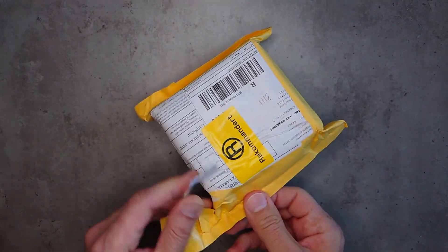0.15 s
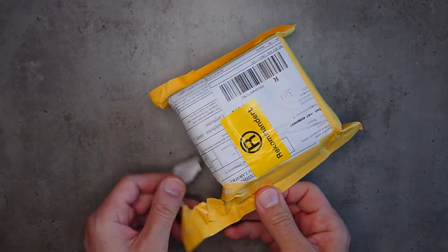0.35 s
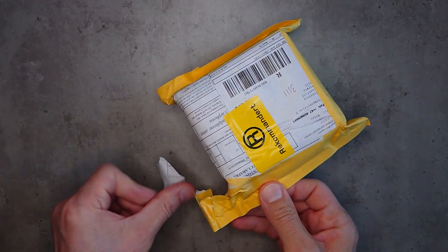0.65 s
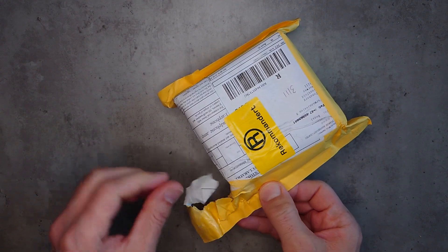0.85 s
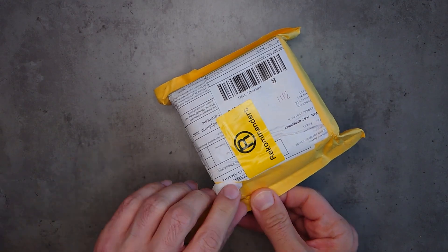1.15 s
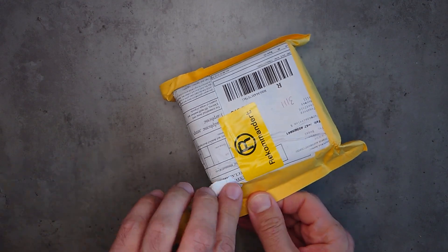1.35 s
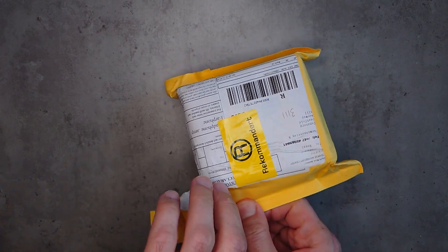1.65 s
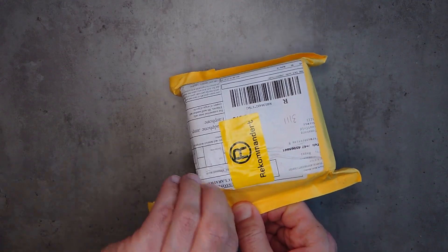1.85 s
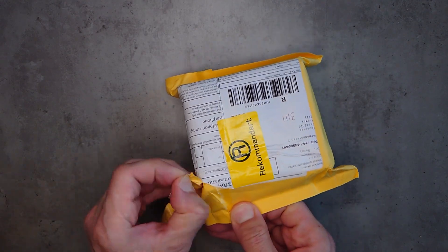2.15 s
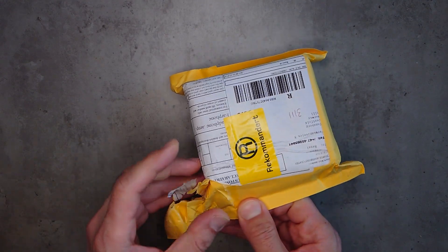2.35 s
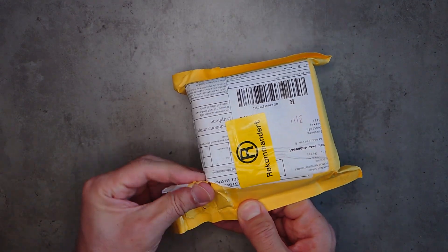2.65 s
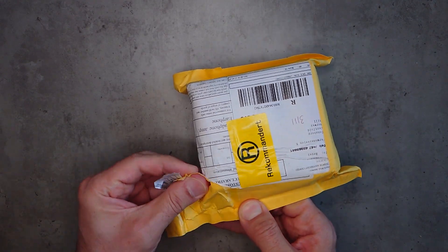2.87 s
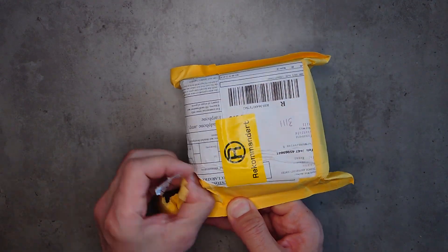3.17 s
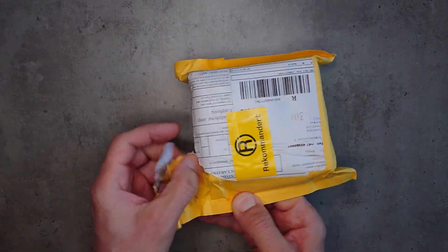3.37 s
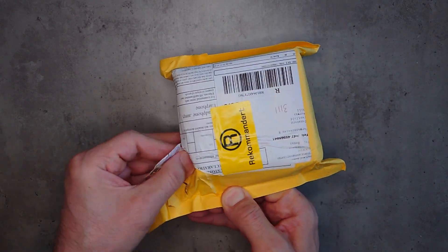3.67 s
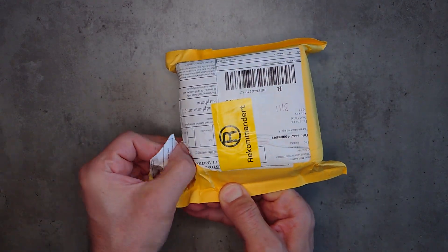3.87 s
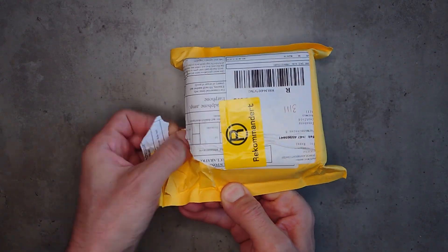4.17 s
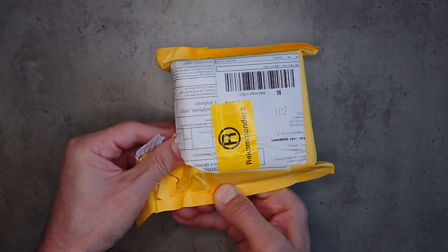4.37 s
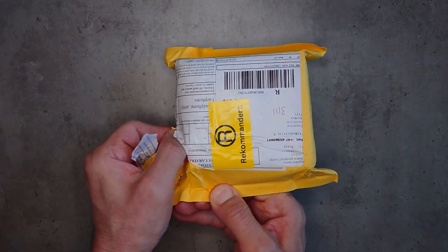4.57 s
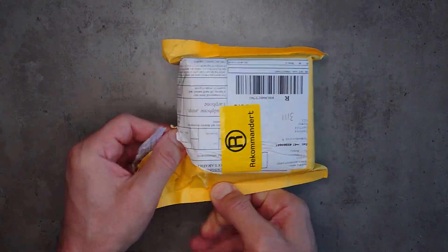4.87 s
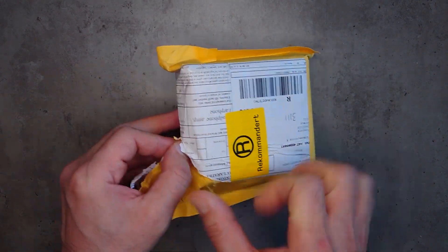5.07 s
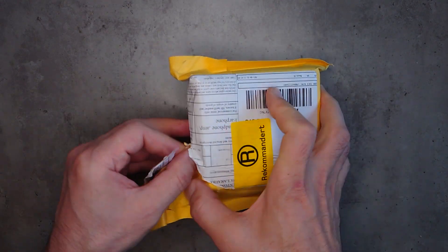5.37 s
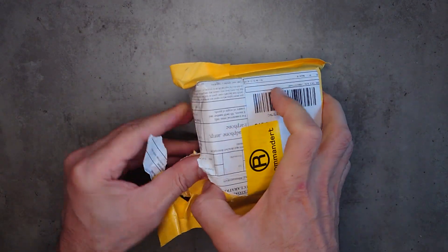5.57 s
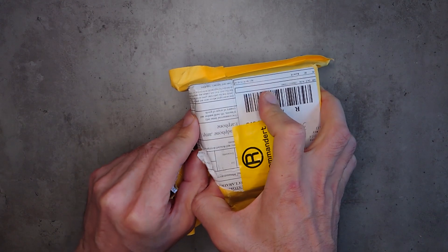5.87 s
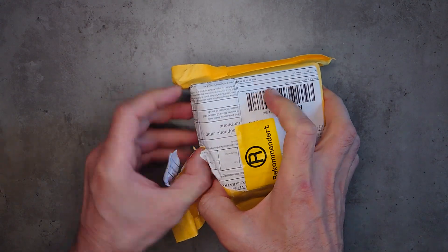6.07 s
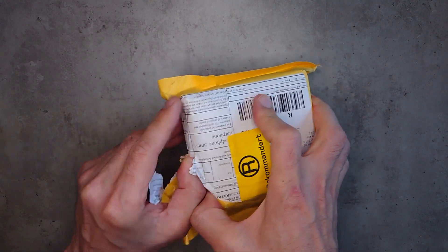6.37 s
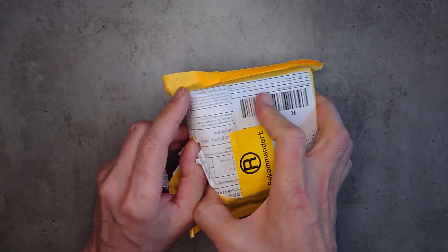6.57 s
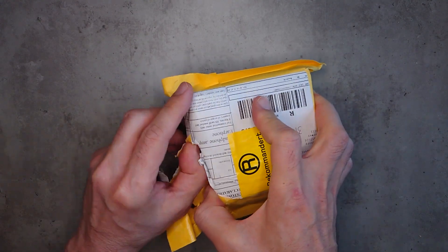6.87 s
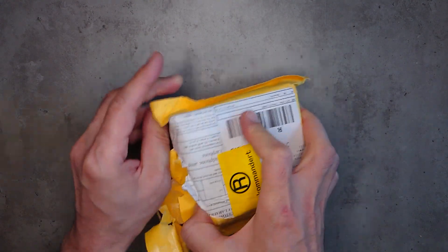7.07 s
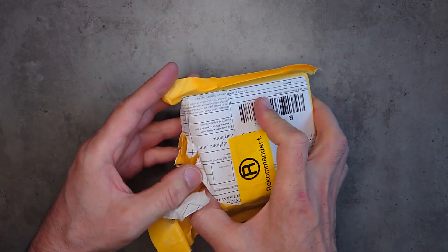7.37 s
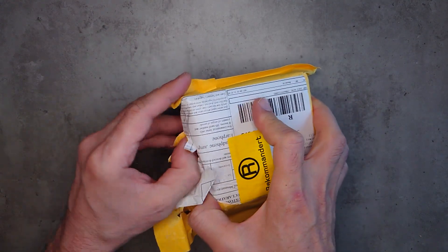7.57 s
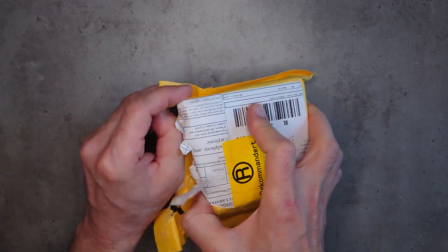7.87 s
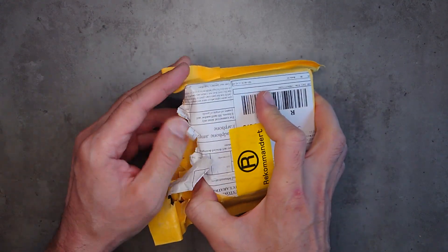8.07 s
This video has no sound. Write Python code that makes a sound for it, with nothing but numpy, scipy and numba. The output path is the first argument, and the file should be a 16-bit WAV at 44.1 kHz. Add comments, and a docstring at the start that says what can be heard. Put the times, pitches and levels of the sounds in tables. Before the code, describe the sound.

Fingers pull at a padded paper mailer in a quiet room. A brief crumple opens, then sparse light rustles and tiny ticks. From about three seconds sharp crease snaps and denser crackling arrive, becoming strongest around seven to eight seconds. Soft low table bumps occur now and then. Close stereo microphones catch crisp, dry detail with a short room tail over faint hum and air.

```python
"""A crackle and a rustle come first: fingers crumple and tear a padded paper envelope on a table.
Creases snap one by one as short ringing wavelets, over a dense rustle of thousands of smaller ones.
A thumb drags over the flat faces, and the parcel bumps the table, whose top rings low.
Sharp echoes and a short room tail follow the paper; a wavering hum, a rumble and faint air lie beneath.
Two microphone ports pick it all up in stereo, each with its own tone colour."""
import sys
import numpy as np
from scipy import signal
from scipy.fft import rfft, irfft, next_fast_len
from scipy.io import wavfile
from scipy.ndimage import uniform_filter1d
from numba import njit

SR = 44100
rng = np.random.default_rng(int(sys.argv[2]) if len(sys.argv) > 2 else 0)


def transcribe(signal):
    """Save signal, clipped to [-1, 1], as a 16-bit WAV file at the path in sys.argv[1]."""
    frames = np.atleast_2d(signal).T
    limited = np.clip(frames, -1, 1)
    pcm = np.round(limited * 32767).astype(np.int16)
    wavfile.write(sys.argv[1], SR, pcm)


N = 362943  # length in samples
PADDING_HZ, FOLD_HZ, FIBRE_HZ, PARCEL_HZ = 697, 1320, 10300, 353


def undb(db):
    """Turn decibels into a plain gain."""
    return 10 ** (np.asarray(db) / 20)


def unit(x):
    """Scale a sound to an average (RMS) level of 1."""
    return x / np.sqrt(np.mean(x ** 2))


def along(table):
    """Draw straight lines between the points of a table: one value per sample for each column after time."""
    s, *columns = np.transpose(table)
    return [np.interp(np.arange(N) / SR, s, column) for column in columns]


def colour(x, points):
    """Shape the tone by (pitch_hz, level_db) points, joined on a log pitch axis."""
    size = next_fast_len(x.shape[-1])
    point_hz, point_db = np.transpose(points)
    hz = np.arange(size // 2 + 1) * SR / size
    gain = undb(np.interp(np.log(hz + 1), np.log(point_hz), point_db))
    return irfft(rfft(x, size) * gain, size)[..., :x.shape[-1]]


def walk(rate):
    """A random wandering curve around 0: new values `rate` times a second, joined by slopes."""
    hold = int(SR / rate)
    values = rng.standard_normal(N // hold + 1)
    return 1.056 * uniform_filter1d(np.repeat(values, hold), hold)[:N]


@njit
def flicks(n, sr, s, hz, cycles, ring, size, pan, lag):
    """Short sine wavelets under a bell curve whose falling side is stretched by `ring`.

    pan is the left-to-right gain ratio; lag is how many samples the right port hears later.
    """
    out = np.zeros((2, n))
    for k in range(len(s)):
        wide = cycles[k] * sr / hz[k] / 2  # samples
        for c in range(2):
            mid = s[k] * sr + (c - .5) * lag[k]
            gain = size[k] * pan[k] ** (.5 - c)
            first = max(int(mid - 3 * wide), 0)
            last = min(int(mid + 3 * wide * ring) + 2, n)
            for i in range(first, last):
                u = (i - mid) / (wide * ring if i > mid else wide)
                out[c, i] += gain * np.exp(-u * u) * np.sin(2 * np.pi * hz[k] * (i - mid) / sr)
    return out


# Snapping creases, with the level of each part of the snap:
# start_s, padding_db, fold_db, crease_db, crease_pitch_hz, fibres_db, after_crackle_db (against the crease)
CREASE_SNAPS = [(0.0189, -25, -19.5, -24, 2760, -28, 3.5), (0.2119, -64, -37, -36, 4480, -30, 1),
                (0.2857, -35, -27, -27, 3400, -24, 3.5), (0.292, -44, -40, -26, 4600, -20.5, -6),
                (0.3011, -51, -30, -27, 4600, -24, -10), (.7268, -59, -36, -28.5, 3920, -9.5, 7.5),
                (1.0762, -64, -31.5, -31, 4830, -38, -17), (1.3033, -40, -44, -23.5, 2800, -32, -15),
                (1.416, -69, -37, -32.5, 2700, -36, -7), (1.4745, -67, -33.5, -20, 6450, -27, -26),
                (1.482, -53, -49, -44, 2600, -48, -4), (1.7604, -71, -54, -33.5, 5500, -51, -7),
                (2.034, -63, -45, -45, 3770, -27.5, -15), (2.0621, -44, -34, -35, 3070, -34, -12),
                (2.1387, -47, -31, -50, 4020, -13.5, -12), (2.2364, -56, -51, -27.5, 5330, -42, -12),
                (2.241, -40, -37, -44, 3000, -43, -12), (2.286, -38, -39, -39, 2660, -37, -7),
                (2.3482, -43, -33.5, -43, 2200, -26.5, 5), (2.4065, -32, -36.5, -36, 2480, -53, -23),
                (2.5264, -53, -44, -44, 2710, -39, 0), (2.569, -45, -61, -22, 5370, -29, -12),
                (2.741, -58, -32.5, -24, 2160, -41, -8.5), (3.1259, -27.5, -16, -2.5, 3300, -17, -13.5),
                (3.254, -37, -46, -24.5, 3500, -26, 0), (3.2666, -32, -15.5, -14.5, 2510, -37, -6),
                (3.3754, -56, -56, -23, 4920, -26, -15), (3.3836, -56, -51, -26, 4680, -31, -12),
                (3.4144, -42, -20, -15, 3830, -29, -10), (3.4538, -45, -32, -36, 3290, -28, -20),
                (3.508, -46, -29, -15.5, 2870, -35, -22), (3.5172, -34, -25.5, -10.5, 3380, -28, -15),
                (3.8765, -40, -20, -12.5, 2530, -37, -14), (3.9427, -30, -23.5, -25.5, 2900, -21, 4),
                (4.0214, -41, -36, -37, 2940, -39, -12), (4.0699, -59, -41, -29, 3330, -36, -1),
                (4.0779, -32.5, -47, -17.5, 3270, -15, -1.5), (4.1951, -38, -38, -38, 4830, -40, -12),
                (4.2515, -41, -26.5, -18.5, 2510, -40, -18), (4.2956, -34, -32, -26, 5840, -23, -10),
                (4.494, -52, -43, -31, 6360, -30, -6), (4.518, -45, -33, -33, 2500, -42, -1),
                (4.57, -54, -52, -44, 5030, -23, -12), (4.574, -58, -43, -32, 4170, -32, -8),
                (4.6651, -55, -43, -34.5, 3500, -33, -9), (4.825, -31, -27.5, -34.5, 4500, -35, -1),
                (4.8576, -50, -52, -33, 3730, -37, 1), (5.0134, -61, -28.5, -25, 3150, -37, -11),
                (5.2834, -53, -49, -39.5, 4080, -40, 1), (5.4061, -52, -47, -26, 4270, -32, -22),
                (5.443, -40, -34, -44, 2930, -40, -10), (5.4743, -57, -40, -22, 3520, -39, -13),
                (5.6687, -29, -26, -20, 4200, -27, -4), (5.88, -50, -48, -39, 3000, -45, -14),
                (5.971, -35, -34, -36, 2480, -43, -17), (5.9929, -30.5, -30, -20.5, 2330, -39, -18),
                (5.9992, -32.5, -18, -15, 4780, -24, -20), (6.0285, -52, -26.5, -28, 2610, -43, -15),
                (6.0747, -50, -28, -14, 3630, -52, -28), (6.3953, -25.5, -40, -31, 2850, -41, -9),
                (6.4077, -46, -35, -23, 3600, -36, -11), (6.4575, -39, -51, -18, 2970, -20, 0),
                (6.527, -46, -47, -26, 3700, -27, 2), (6.536, -26, -37, -13, 2540, -20, -15),
                (6.7104, -21, -24, -13.5, 2740, -39, -10.5), (6.7677, -31, -25.5, -19.5, 4060, -30, 7),
                (6.9971, -34, -28, -19.5, 4470, -34, -7.5), (7.03, -40, -36, -23, 3600, -24, -4),
                (7.0325, -37, -19, -8, 4020, -13, 0), (7.0365, -20, -9, -12, 2720, -30, -3.5),
                (7.0974, -30, -28, -25.5, 4070, -28, 6), (7.1038, -34, -40, -11.5, 2430, -36, -26),
                (7.2189, -34.5, -40, -20, 2380, -37, -12), (7.3, -45, -31, -34, 3580, -27, 0),
                (7.3046, -46, -42, -29, 3100, -34, -13), (7.4978, -40.5, -33, -36, 3800, -46, -12),
                (7.8095, -41, -59, -32, 5250, -29, 2), (7.8817, -30, -40, -28, 2780, -27, -12),
                (7.932, -22, -6.5, -8.5, 2730, -17, -5), (8.1642, -35, -41, -16.5, 3200, -32, -8.5)]


def snaps():
    """Each snap rings the padding and the fold, flicks the crease and ticks the fibres; smaller creases follow."""
    s, padding_db, fold_db, crease_db, hz, fibre_db, after_db = np.transpose(CREASE_SNAPS)
    chance = rng.random((len(s), 28)).T
    one = np.ones(len(s))
    pan, lag = undb(1.24 * (chance[0] - 3.0) + 1.0), 4.6 * (chance[0] - .5)
    detune = 1.35 ** (chance[1:4] - .5)  # no two folds have the same size
    out = flicks(N, SR, s, hz, 1.32 * one, 1.18, undb(crease_db), pan, lag)
    padding_hz, fold_hz = PADDING_HZ * detune[0], FOLD_HZ * detune[1]
    out += flicks(N, SR, s + 0.00049, padding_hz, 1.07 * one, 2.6, undb(padding_db), pan, lag)
    out += flicks(N, SR, s + 0.00015, fold_hz, 1.82 * one, 0.61, undb(fold_db), pan, lag)

    for k in range(4):  # a few fibres part within about two milliseconds
        fibre_s = s + 0.00223 * k / 3 * chance[4 + k]
        fibre_hz = FIBRE_HZ * 1.35 ** (chance[12 + k] - .5)
        out += flicks(N, SR, fibre_s, fibre_hz, 0.97 * one, 1.04, undb(fibre_db - 2.44 * k), pan, lag)

    # eight small creases crackle around and just after each snap; later ones are weaker
    late, pitch, size = chance[4:].reshape(3, 8, -1)
    many = np.ones_like(late)
    after_s = s - .0008 + 0.0072 * late
    after_hz = hz * 4.0 ** (pitch - .45)
    after_size = undb(crease_db + after_db - 6 * size - 9 * late)
    return out + flicks(N, SR, after_s.ravel(), after_hz.ravel(), 2.4 * many.ravel(), 0.57,
                        after_size.ravel(), (pan * many).ravel(), (lag * many).ravel())


# Each pull or squeeze of the fingers is one surge of rustle:
# peak_s, swell_s, fade_s, large_folds_db, small_creases_db, fibres_db, small_crease_pitch_hz
FINGER_PULLS = [(0.02, 0.089, 0.054, -41, -41, -45, 3230), (.19, 0.13, 0.12, -56, -53.5, -61, 3950),
                (.299, 0.047, 0.064, -48, -46, -45, 4400), (.712, 0.063, 0.017, -66, -67, -59, 5030),
                (.974, 0.0096, 0.016, -58, -51.5, -61, 3800), (1.078, 0.017, 0.037, -63, -54, -50.5, 4600),
                (1.137, 0.054, 0.069, -54, -51, -53, 4600), (1.348, 0.04, 0.037, -52, -50, -52, 3900),
                (1.485, .06, 0.054, -52, -53, -60, 4520), (1.692, 0.17, 0.12, -55.5, -50, -62, 4180),
                (1.951, 0.038, 0.041, -45.5, -43.5, -48.5, 4300),
                (2.149, 0.077, 0.069, -41, -42, -42.5, 3900), (2.33, 0.083, 0.057, -60, -55.5, -59, 3470),
                (2.57, 0.024, 0.11, -48.5, -46.5, -54, 4560), (2.957, 0.12, 0.031, -49, -50, -54, 3060),
                (3.115, 0.097, 0.075, -52, -44.5, -52, 3680), (3.254, 0.0054, 0.035, -43, -40, -41.5, 3450),
                (3.304, .04, 0.064, -50.5, -37.5, -44, 4600),
                (3.454, 0.013, 0.052, -41.5, -35.5, -43.5, 4150),
                (3.757, 0.22, 0.12, -50.5, -48.5, -53, 4160), (3.951, 0.018, 0.14, -66, -44.5, -53, 3560),
                (4.079, 0.013, 0.032, -45.5, -43.5, -49, 3450), (4.157, .017, 0.011, -44, -41, -45, 3400),
                (4.329, 0.077, 0.033, -44.5, -40.5, -46.5, 2850),
                (4.476, 0.027, 0.074, -59, -48.5, -51, 2960), (4.576, 0.13, 0.18, -53.5, -49, -54.5, 3660),
                (4.833, 0.034, 0.23, -51.5, -54, -57, 3550), (5.012, 0.053, 0.031, -47.5, -45, -48, 2840),
                (5.21, 0.17, .07, -61.5, -55, -60, 4200), (5.294, 0.015, 0.11, -56, -52, -58, 3150),
                (5.488, 0.061, 0.026, -51, -41.5, -47.5, 4300),
                (5.595, 0.048, 0.088, -50, -48.5, -52.5, 4700), (5.676, 0.015, 0.028, -51, -39, -42, 3700),
                (5.805, 0.069, 0.3, -50.5, -48, -52, 4060), (6.006, 0.015, 0.033, -49.5, -41, -53, 3530),
                (6.16, 0.09, 0.064, -56, -47.5, -56, 3660), (6.218, 0.02, 0.011, -43.5, -34.5, -35, 3780),
                (6.316, .08, 0.4, -61, -48.5, -58, 4020), (6.457, 0.18, 0.031, -47.5, -45.5, -44.5, 3420),
                (6.537, 0.052, .15, -54, -61, -47.5, 3030), (6.727, 0.043, 0.064, -66, -44.5, -47.5, 3040),
                (6.88, .06, 0.068, -47.5, -48.5, -50, 3500), (7.039, 0.019, 0.077, -39.5, -45, -48, 3200),
                (7.1, 0.052, 0.017, -39, -28.5, -34.5, 3100), (7.198, 0.093, 0.04, -43, -34.5, -39.5, 3790),
                (7.301, 0.0084, 0.0073, -44, -32, -43, 3490),
                (7.348, 0.028, 0.03, -42.5, -45.5, -47.5, 3830),
                (7.499, 0.078, 0.042, -55, -46.5, -52, 3800), (7.623, .042, 0.066, -47.5, -40, -45.5, 4560),
                (7.886, 0.0051, 0.033, -37, -29.5, -33.5, 2960), (7.92, 0.11, 0.056, -43.5, -41, -40, 2930),
                (8.119, 0.048, 0.058, -42, -38.5, -41.5, 3530),
                (8.229, 0.017, 0.036, -46.5, -32, -40, 3460)]
SLOPE_DB = 10  # a surge gains this much over its swell time and loses it over its fade time


def pulls():
    """Levels in dB of folds, creases and fibres, and the crease pitch; overlapping surges add up in power."""
    t = np.arange(0, N / SR + .002, .001)
    s, swell, fade, *peaks_db, hz = np.array(FINGER_PULLS).T[:, :, None]
    before = (s - t) / np.maximum(swell, .003)
    after = (t - s) / np.maximum(fade, .003)
    away = np.where(t < s, before, after)
    powers = [np.sum(undb(db - SLOPE_DB * away) ** 2, axis=0) for db in peaks_db]
    levels = [10 * np.log10(power + 1e-12) for power in powers]
    crease_hz = np.interp(t, s[:, 0], hz[:, 0])
    return along(np.transpose([t, *levels, crease_hz]))


# Grains of the parcel, large folds, small creases and fibres, one row each:
# pitch_spread_octaves, length_cycles (longer when a face rings), grains_per_s, size_scatter_db,
# share_that_rings_a_face (0 to 1)
RUSTLE_GRAINS = [(0.5, 1.33, 400, 3.5, 0.013), (0.538, 1.27, 1600, 3.5, 0.32),
                 (0.599, 1.79, 5000, 2.5, 0.22), (1, 0.55, 9300, -0.1, 0.)]
# Pitch of the large folds over time: time_s, pitch_hz
LARGE_FOLD_PITCH = [(0, 890), (.4, 1333), (1.8, 1193), (3.5, 1084), (5.8, 1013), (7.2, 1263), (8.23, 1200)]
# The whole parcel flexes with the large folds: time_s, level_db (against the large folds)
PARCEL_FLEX = [(0, -11.5), (.4, -11), (1, -23), (4.5, -21), (5.6, -13), (7.1, -10), (8.23, -17.5)]
# Flat faces of the envelope that ring: pitch_hz
FACE_PITCHES = [500., 640., 890., 1080., 1390., 2050., 2390., 2850., 3750., 4200., 4750., 5500., 6800.]


def rustle():
    """Dense grains of random pitch, size and place; their level is uneven as the paper slips."""
    fold_db, crease_db, fibre_db, crease_hz = pulls()
    fold_hz, = along(LARGE_FOLD_PITCH)
    levels = [fold_db + along(PARCEL_FLEX)[0], fold_db, crease_db, fibre_db]
    centres = [np.full(N, PARCEL_HZ), fold_hz, crease_hz, np.full(N, FIBRE_HZ)]
    faces_hz = np.array(FACE_PITCHES)
    out, slip = 0, walk(40)  # the slip is shared by all four layers
    # the fingers damp and free each face independently
    freed = undb([min(hz / 800, 4) * walk(8) for hz in faces_hz])

    for (octaves, cycles, rate, scatter_db, share), db, centre in zip(RUSTLE_GRAINS, levels, centres):
        when, size, side, sign, rings, a, b, c = rng.random((int(rate * N / SR), 8)).T
        at = (when * N).astype(int)
        bell = 2 * (a + b + c) - 3  # random, most often near 0
        hz = np.minimum(centre[at] * 2 ** (octaves * bell), .42 * SR)

        # some grains ring the face nearest in pitch, and ring longer
        face = np.argmin(np.abs(np.log(hz[:, None] / faces_hz)), axis=1)
        rings = rings < share
        hz = np.where(rings, faces_hz[face] * (1 + 0.084 * (a - b)), hz)
        lengths = cycles * np.where(rings, 2.6, 1.)

        size = np.sign(sign - .5) * undb(-scatter_db * np.log(1.004 - size))
        size = size * np.where(rings, freed[face, at], 1)
        pan, lag = undb(11 * (side - .5) - 1), 7 * (side - .5)
        layer = flicks(N, SR, when * N / SR, hz, lengths, 1.07, size, pan, lag)
        out = out + unit(layer) * undb(db + 1.15 * slip + 2.97 * walk(70))
    return out


# A thumb drags over one face: middle_s, length_s, pitch_hz, level_db (each slip varies around pitch and level)
THUMB_RUBS = [(1.13, 0.054, 1280, -59), (2.935, 0.076, 1270, -46), (7.905, 0.017, 2450., -34.5),
              (1.11, .1, 5600, -58), (1.68, .14, 4700, -56), (1.69, .14, 1290, -58), (3.04, .12, 1400, -54),
              (4.3, 0.077, 2800, -48), (4.485, .05, 2800, -56)]


def rubs(count=40):
    """Quick slips of the skin, scattered over each drag, keep one face of the envelope ringing."""
    s, length, hz, db = np.repeat(THUMB_RUBS, count, axis=0).T
    when, pitch, size = rng.random((len(s), 3)).T - 1 / 2
    one = np.ones(len(s))
    slip_s, slip_hz = s + length * when, hz * 2 ** (pitch / 4)
    return flicks(N, SR, slip_s, slip_hz, 4 * one, 1.5, undb(db + 10 * size), one, 0 * one)


# Parcel and hands bump the table: start_s, level_db, pitch_hz, table_ring_db (against the bump)
TABLE_BUMPS = [(0.018, -47.5, 181, 0), (3.244, -44, 135, -10), (3.46, -45, 90, -2),
               (4.851, -38.5, 132, 1.5), (5.022, -50, 96.9, 2), (5.041, -49, 107, 4),
               (5.287, -38.5, 143, -6), (5.326, -41, 91.5, -3), (6.535, -36, 138, -4),
               (7.024, -44.5, 122, -1), (7.099, -41, 93, -3), (7.93, -28, 183, -20)]
# Ways the table top rings: pitch_hz, rise_cycles, ring_stretch (fall against rise), level_db
TABLE_RINGS = [(51, 0.66, 5.7, -7.5), (137, 1.1, 12, -19), (380, 2.9, 3.6, -5)]


def bumps():
    """A soft push at its own pitch, and the table top rings low; both are louder on the left."""
    s, db, hz, ring_db = np.transpose(TABLE_BUMPS)
    one = np.ones(len(s))
    out = flicks(N, SR, s + 0.0046, hz, 0.65 * one, 2.5, undb(db), undb(8.5) * one, 0 * one)
    for mode_hz, cycles, ring, mode_db in TABLE_RINGS:
        size = undb(db + ring_db + mode_db)
        start = s + 0.48 / mode_hz
        out += flicks(N, SR, start, mode_hz * one, cycles * one, ring, size, undb(5.0) * one, 0 * one)
    return out


# Sharp echoes from the table and nearby surfaces, before their tone is shaped: delay_ms, left_db, right_db
NEAR_ECHOES = [(2.2, -13., -9.), (10.0, -22., -17.), (12.3, -23., -20.)]
# Room tail in pitch bands: pitch_hz, time_to_fall_60_db_s, level_db
ROOM_TAIL = [(700., .28, -18.), (2500., .36, -17.), (6000., .3, -15.), (12000., .22, -15.)]


def reply():
    """Three sharp echoes and a noise tail whose pitch bands each die at their own speed."""
    t = np.arange(int(SR / 2)) / SR
    out = np.zeros((2, len(t)))
    for ms, left_db, right_db in NEAR_ECHOES:
        at = int(ms * SR / 1000) + rng.integers(-6, 7, size=2)  # slightly different at each port
        out[[0, 1], at] = undb([left_db, right_db])
    out = colour(out, [(300, -9.), (3500, 1.5), (12000, -8.)])

    swell = np.clip((t - .006) / .006, .2, 1)  # the walls answer late
    for hz, t60, db in ROOM_TAIL:
        mid, side = rng.standard_normal(out.shape)
        # long waves reach both ports more alike
        noise = mid + min(hz / 2000., 1) * side * np.array([[1], [-1]])
        band = colour(noise, [(hz / 3, -30), (hz / 1.5, 0), (hz * 1.5, 0), (hz * 3, -30)])
        band = band * swell * 1000. ** (-t / t60)
        out = out + undb(db) * band / np.sqrt(np.sum(band ** 2) / 2)
    return out


def room(x, count=4):
    """The hands keep moving, so the room answers from one spot after another, crossfading round a loop."""
    turn = np.arange(N) / SR / .15 % count  # a new spot every 0.15 s
    out = x
    for k in range(count):
        distance = np.abs((turn - k + count / 2) % count - count / 2)
        share = np.clip(1 - distance, 0, 1)
        out = out + signal.oaconvolve(x * share, reply(), axes=1)[:, :N]
    return out


# Hum over time, before its random waver: time_s, level_db
HUM_LEVEL = [(0.0, -77), (0.13, -63.5), (0.3, -80), (0.68, -56.5), (1.79, -87), (2.01, -58), (2.22, -70),
             (2.45, -61), (2.54, -82), (2.75, -59), (2.98, -72.5), (4.22, -58.5), (4.44, -75), (5.36, -65),
             (5.45, -85), (5.91, -77), (5.96, -58), (6.37, -88), (6.55, -64), (6.97, -81), (7.04, -60),
             (7.52, -82), (7.91, -63.5), (8.23, -73.5)]
HUM_HZ, HUM_WANDER_HZ = 86., 2.5
# Rumble over time, before its random waver and left-right tilt: time_s, level_db
RUMBLE_LEVEL = [(0, -68), (3.8, -78), (4.1, -57), (4.35, -65), (4.75, -80), (4.95, -63), (5.38, -67),
                (5.5, -76), (8.23, -70)]
# Tone of the air noise: pitch_hz, level_db (only the shape counts)
AIR_COLOUR = [(30, -31), (70, -9.5), (132, 0), (190, -7.5), (290, -32.5), (390, -15.5), (600, -13),
              (8500, -18), (16000, -33)]
AIR_DB = -62  # average, before its slow waver


def background():
    """A sine hum that comes and goes and wanders in pitch, a noise rumble and faint air noise."""
    hum_db, = along(HUM_LEVEL)
    phase = np.cumsum(HUM_HZ + HUM_WANDER_HZ * walk(19)) / SR  # turns
    hum = np.sin(2 * np.pi * phase) * undb(hum_db + 3.5 * walk(22))

    rumble = unit(colour(rng.standard_normal(N), [(18, -30), (40, 0), (58, 0), (85, -30)]))
    tilt_db = np.array([[3.0], [-3.0]])  # louder on the left
    rumble = rumble * undb(along(RUMBLE_LEVEL)[0] + 2.5 * walk(10) + tilt_db)

    mid, side = rng.standard_normal((2, N))
    air = colour(mid + 1.3 * side * np.array([[1], [-1]]), AIR_COLOUR)
    return hum + rumble + unit(air) * undb(AIR_DB + 0.86 * walk(3.03))


def scene():
    """The paper sounds in the room, plus the bumps and the background without room reply."""
    return room(snaps() + rustle() + rubs()) + bumps() + background()


# Tone of the left microphone port: pitch_hz, level_db
LEFT_PORT = [(35, 0), (60, -8), (120, -7.5), (400, -7.5), (1300, -1.5), (4600, -5.5), (6200, 0),
             (6900, -25), (7800, -23), (8800, -3), (10500, -5), (11700, -1.5), (14500, 3.5)]
# Tone of the right microphone port: pitch_hz, level_db
RIGHT_PORT = [(35, -2), (60, 5), (120, 5), (400, -7), (1300, -4.5), (4800, -1.5), (6800, 5), (8200, -2),
              (12000, 2), (15500, -2)]
TOP_HZ = 15900


def record(dry):
    """Each port has its own colour, the left one a notch from the housing; a steep filter cuts the top."""
    ports = np.array([colour(dry[0], LEFT_PORT), colour(dry[1], RIGHT_PORT)])
    top_cut = signal.ellip(10, .2, 80, TOP_HZ, fs=SR, output="sos")
    return signal.sosfilt(top_cut, ports)


dry = scene()
out = record(dry)
transcribe(out)
```